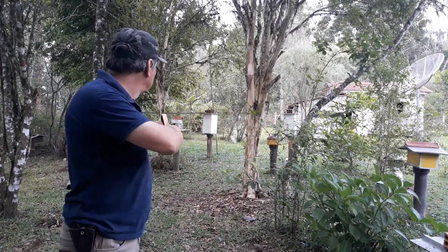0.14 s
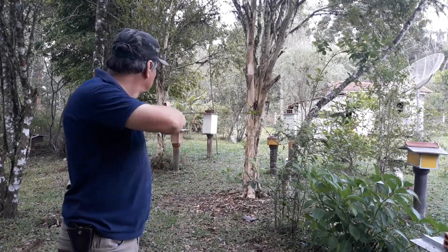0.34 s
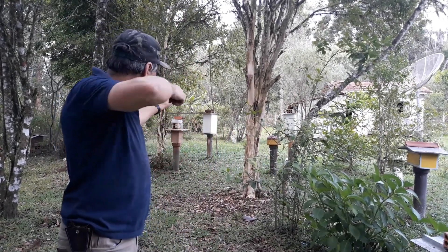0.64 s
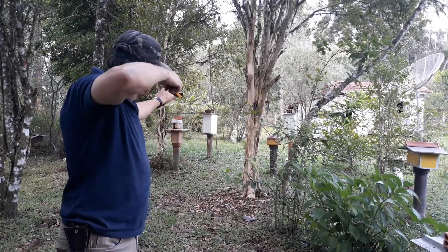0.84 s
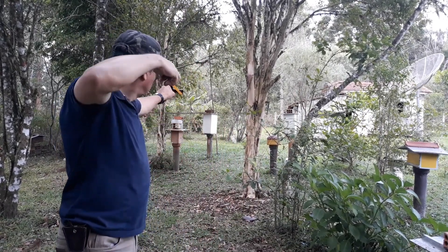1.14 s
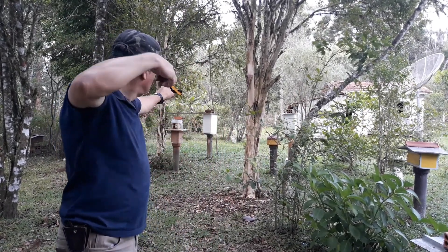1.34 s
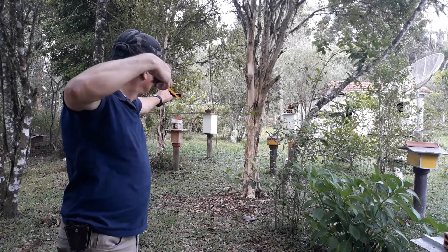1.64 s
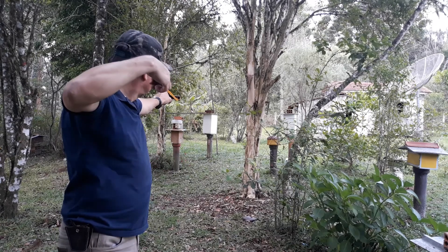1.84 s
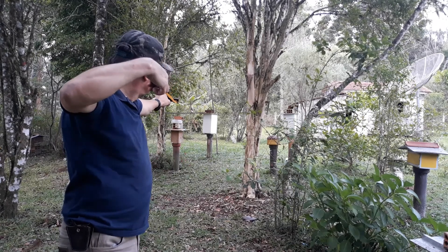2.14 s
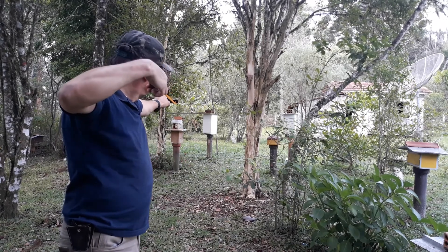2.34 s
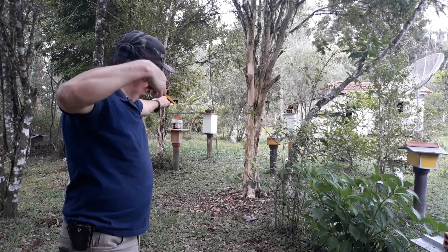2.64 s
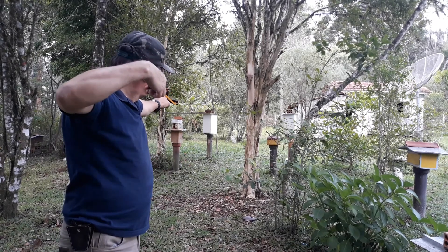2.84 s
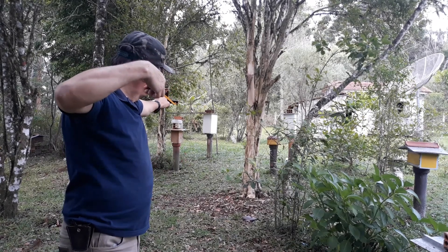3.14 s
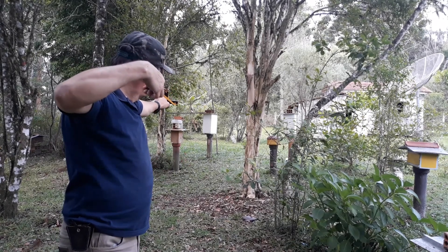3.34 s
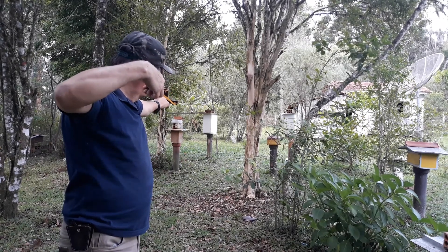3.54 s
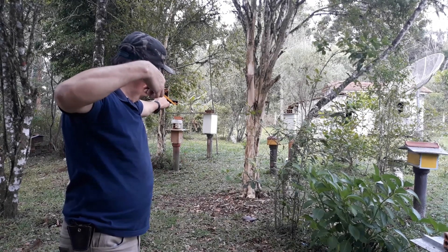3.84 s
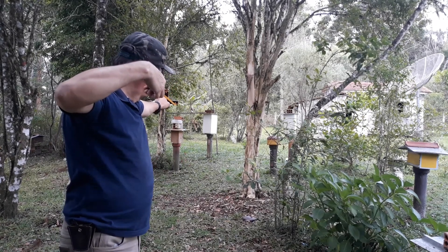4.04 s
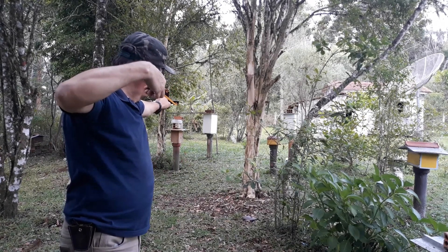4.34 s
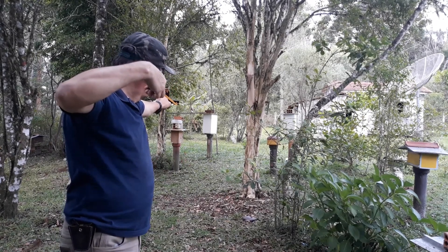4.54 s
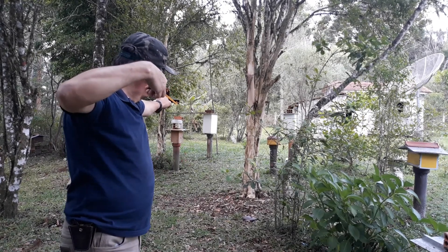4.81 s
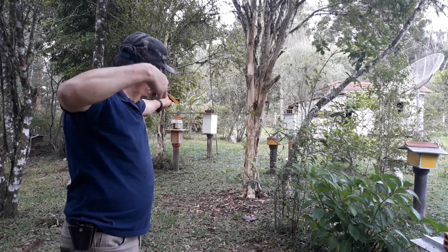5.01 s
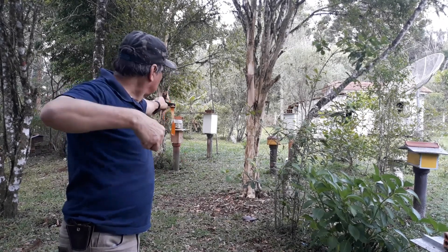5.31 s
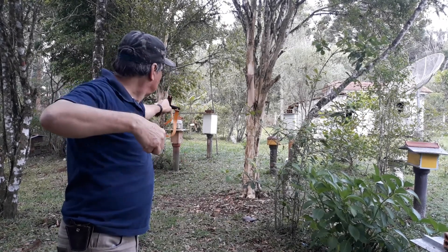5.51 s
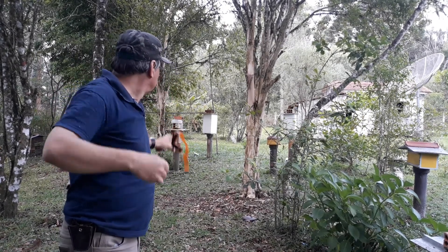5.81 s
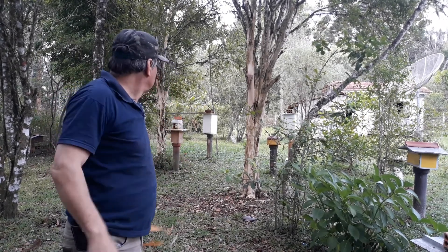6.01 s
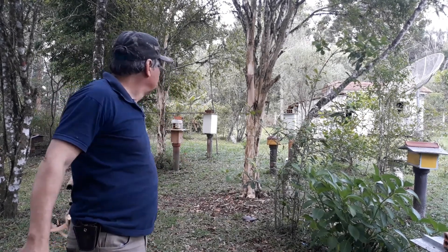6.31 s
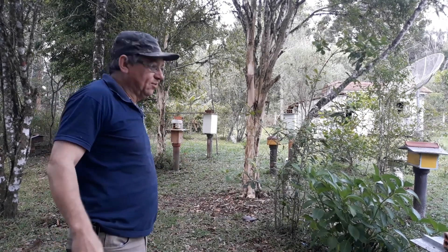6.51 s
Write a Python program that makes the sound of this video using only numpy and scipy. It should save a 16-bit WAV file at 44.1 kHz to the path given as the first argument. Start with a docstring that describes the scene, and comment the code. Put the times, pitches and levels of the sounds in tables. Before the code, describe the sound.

In a quiet garden with birdsong, a slingshot snaps sharply and its shot punches through a tin can, followed by a knock on wood.

```python
"""A slingshot in a quiet garden

Air murmurs, leaves hiss, a breeze buffets the microphone, and a bird whistles four falling notes
over fainter calls. The bands swish and snap; 0.15 s later the shot punches through a tin can and
excites its wall modes, and half a second on something knocks on resonant wood. Trees scatter every
blow into a short tail. At the end a shoe scuffs the leaf litter."""
import sys
import numpy as np
from scipy import signal
from scipy.fft import rfft, irfft, next_fast_len
from scipy.io import wavfile
from scipy.ndimage import uniform_filter1d, map_coordinates

SR = 44100
rng = np.random.default_rng(int(sys.argv[2]) if len(sys.argv) > 2 else 0)


def int16_out(signal):
    """Quantize to a 16-bit WAV file."""
    q = np.round(np.clip(np.atleast_2d(signal).T, -1, 1) * 32767)
    wavfile.write(sys.argv[1], SR, q.astype(np.int16))


N = 293706
TIME = np.arange(N) / SR
T = np.arange(SR * 3 // 4) / SR  # the life of one blow, in seconds
LEAD_S = .005  # time before the centre of a pressure pulse


def amp(db):
    """Amplitude ratio of a level in decibels."""
    return 10 ** (np.asarray(db) / 20)


def unit(x):
    """Normalisation to rms 1."""
    return x / np.sqrt(np.mean(x ** 2) + 1e-20)


def along(points, hz):
    """Interpolation of (Hz, value) points in log frequency."""
    f, v = np.transpose(points)
    return np.interp(np.log(hz + 1), np.log(f + 1), v)


def add(track, s, sound):
    """Superposition of a sound on the track from s seconds."""
    part = track[round(s * SR):][:len(sound)]
    part += sound[:len(part)]


def wobble(rate, size):
    """Smooth random modulation, with rate knots a second."""
    knots = rng.standard_normal(int(size * rate / SR) + 4)
    return map_coordinates(knots, [np.arange(size) * rate / SR])


def filtered(x, response):
    """Linear filtering: the spectrum is multiplied by a frequency response."""
    m = next_fast_len(len(x) + SR // 10, True)
    return irfft(rfft(x, m) * response(np.fft.rfftfreq(m, 1 / SR)), m)[:len(x)]


def resonances(peaks, f):
    """Summed response of damped resonators, each given as (Hz, width in Hz, dB)."""
    return sum(amp(db) * 1j * f * w / (c * c - f * f + 1j * f * w) for c, w, db in peaks)


def noise(spectrum, size=len(T)):
    """White noise shaped to a spectrum, at rms 1."""
    return unit(filtered(rng.standard_normal(size), lambda f: amp(along(spectrum, f))))


def fade(t60):
    """Exponential decay by 60 dB in t60 seconds."""
    return np.exp(-np.log(1000) * np.minimum(T / t60, 10))


def pulse(half_s):
    """A bipolar pressure pulse of peak 1: rarefaction, then compression."""
    u = np.clip((T - LEAD_S) / half_s, -10, 10)
    return u * np.exp((1 - u * u) / 2)


def patchy(x, depth_db):
    """Random modulation: patches of gain drift in time and frequency."""
    z = signal.stft(x, nperseg=512)[2]
    field = uniform_filter1d(rng.standard_normal(z.shape), size=6, axis=0)
    field = uniform_filter1d(field, size=20, axis=1)
    return unit(signal.istft(z * amp(depth_db * unit(field)), nperseg=512)[1][:N])


# Course of the distant murmur. Each row: time in seconds, relative level in dB.
MURMUR_LEVELS = [(0.0, -54.5), (0.25, -53.5), (1.13, -56.5), (1.74, -55), (2.3, -57.5), (5.0, -59)]
# Spectra of the murmur and the leaves. Each row: frequency in Hz, relative density in dB.
MURMUR_SPECTRUM = [(100, -13), (170, -1.5), (270, -2.5), (390, .5), (520, -3), (750, -4.5), (1050, -6),
                   (1500, -12.5), (2200, -11), (2900, -15.5), (3500, -15.5), (6000, -26.5), (8000, -49.5)]
LEAF_SPECTRUM = [(1500, -18.5), (3000, -1.5), (4800, 3), (6800, -1), (9000, 2), (10200, -5.5), (12500, -7),
                 (15800, -14)]


def air_and_leaves():
    """Broadband flow noise: far-off air murmurs, and the hiss of leaves weakly follows its level."""
    air_db = np.interp(TIME, *np.transpose(MURMUR_LEVELS))
    murmur = amp(air_db + 1.5) * patchy(noise(MURMUR_SPECTRUM, N), depth_db=0.95)
    leaves = amp(-68 + .3 * (air_db - air_db.mean())) * noise(LEAF_SPECTRUM, N)
    return murmur + leaves


# Puffs of wind. Each row: centre in seconds, level in dB, half width in seconds.
PUFFS = [(.42, -51, .02), (.725, -40, 0.039), (1.505, -43, 0.041), (2.21, -51, 0.017), (2.53, -55, .04),
         (2.77, -49.5, 0.0225), (3.385, -43.5, 0.0189), (3.51, -48.5, 0.0175), (3.63, -49.5, 0.041),
         (4.82, -47, 0.016), (5.35, -52, 0.034), (5.54, -51.5, 0.026), (5.7, -55.5, 0.036)]
# Spectrum of the buffeting. Each row: frequency in Hz, relative density in dB.
BUFFET_SPECTRUM = [(15, -45.5), (30, -18.5), (55, -3), (85, 1.5), (125, -2.5), (200, -14.5), (320, -28),
                   (700, -58), (1500, -100)]


def breeze():
    """Turbulent pressure on the microphone makes a low rumble that swells with each puff."""
    steady = amp(-60 + 0.5 * wobble(7.8, N))
    puffs = sum(amp(db) / (1 + ((TIME - s) / width) ** 2) for s, db, width in PUFFS)
    return (steady + puffs) * noise(BUFFET_SPECTRUM, N)


# Reverberation of the garden. Each row: frequency in Hz, 60 dB decay time in seconds.
GARDEN_DECAY = [(200, .3), (900, 0.6), (2200, 0.629), (5000, 0.573), (9000, 0.41), (15000, 0.35)]


def garden(x, build_s):
    """Scattering from trunks and foliage: a tail builds up, then dies, lingering in the midrange."""
    hz, t, z = signal.stft(rng.standard_normal(SR), SR, nperseg=256)
    decay = np.exp(-np.log(1000) * t / along(GARDEN_DECAY, hz)[:, None])
    tail = signal.istft(z * decay * (1 - np.exp(-t / build_s)), SR, nperseg=256)[1]
    return signal.fftconvolve(x, tail / np.linalg.norm(tail))[:N]


def whistle(length, start_hz, end_hz, rough_db):
    """A frequency-modulated tone glides fast, flattens out, and flutters as it swells to its middle."""
    size = int(length * SR)
    u = np.arange(size) / size
    glide_hz = end_hz + (start_hz - end_hz) * (1 - u) ** 1.85
    hz = glide_hz * (1 + .0025 * wobble(120, size) + .006 * wobble(22, size))
    swell = amp(-17 * (2 * u - 1) ** 2 + rough_db * wobble(60, size))
    gate = np.clip(np.minimum(u, 1 - u) * length / .012, 0, 1)
    return np.sqrt(2) * gate * swell * np.sin(2 * np.pi * np.cumsum(hz) / SR)


def chatter(from_s=.55, until_s=5.0519, count=45):
    """Faint, randomly timed calls from deep in the trees arrive by scattering alone."""
    calls = np.zeros(N)
    for _ in range(count):
        pitch, glide = rng.standard_normal(2)
        start_hz = 2700 * np.exp(.16 * pitch)
        end_hz = start_hz * np.exp(.13 * glide)
        add(calls, rng.uniform(from_s, until_s), whistle(.09, start_hz, end_hz, rough_db=3.5))
    return amp(-74) * garden(calls, build_s=0.028)


# Short calls of distant birds, and the falling notes of a nearer one.
# Each row: start and length in seconds, first and last frequency in Hz, level in dB.
DISTANT_CALLS = [(0.863, 0.0294, 5100, 4450, -61.5), (0.877, 0.066, 4110, 3000, -63),
                 (1.653, .16, 3260, 3390, -73.5), (1.99, .13, 3550, 3200, -67),
                 (2.029, .1, 2900, 2710, -69), (2.873, 0.0698, 3500, 3910, -61.5)]
SONG_NOTES = [(2.262, 0.21, 5360, 4270, -59.5), (2.576, 0.26, 5960, 3219, -55.5),
              (2.969, .345, 7032, 3113, -56.5), (3.467, 0.23, 5600, 3360, -56.5)]


def birds():
    """The ratio of direct to scattered sound falls with distance, so the nearer bird sounds drier."""
    song, distant = np.zeros(N), np.zeros(N)
    for s, length, start_hz, end_hz, db in SONG_NOTES:
        add(song, s, amp(db) * whistle(length, start_hz, end_hz, rough_db=3.0))
    for s, length, start_hz, end_hz, db in DISTANT_CALLS:
        add(distant, s, amp(db) * whistle(length, start_hz, end_hz, rough_db=2.0))
    return song + amp(-0.5) * distant + garden(amp(-5.5) * song + distant, build_s=0.02)


# Slaps of rubber and pouch. Each row: start in seconds, level in dB, 60 dB decay time in seconds.
SLAPS = [(5.0519, -14, 0.014), (5.0524, -9, 0.027), (5.0543, -16, 0.11), (5.0622, -17.5, 0.2),
         (5.149, -30.5, 0.045), (5.827, -53.5, 0.26), (6.135, -67.5, .2)]
# Bright peaks that colour each slap of the bands. Each row: frequency and bandwidth in Hz, gain in dB.
SNAP_PEAKS = [(2050, 120, -5.5), (3570, 220, 5), (5300, 480, -2), (8500, 510, -5.5)]
# Spectra of a slap and of the fork's jolt. Each row: frequency in Hz, relative density in dB.
SLAP_SPECTRUM = [(150, -30.5), (400, -12), (800, -2.5), (1200, -8), (1700, -12.5), (2230, -4), (2800, -9),
                 (4400, -6.5), (5300, -2.5), (6300, -4), (8300, 1.5), (9900, -6), (14000, -4.5),
                 (15800, -6.5)]
JOLT_SPECTRUM = [(25, -18), (60, 3), (120, 1), (250, -9), (400, -6), (800, -7), (1300, -24), (3000, -50)]


def slingshot():
    """Elastic energy is released: the bands swish forward, whip the air and slap against the fork."""
    snap, snap_s = np.zeros(N), SLAPS[1][0]
    swish = noise([(30, -20), (100, -3), (300, -0.5), (900, 0.5),
                   (1800, -15.5), (8000, -12), (15000, -27.5)])
    add(snap, snap_s - T[-1], amp(-29) * fade(.055)[::-1] * swish)  # swells into the snap
    for s, db, t60 in SLAPS:
        slap = unit(filtered(noise(SLAP_SPECTRUM), lambda f: 1 + resonances(SNAP_PEAKS, f)))
        add(snap, s, amp(db) * fade(t60) * slap)
    add(snap, 5.0555 - LEAD_S, amp(-11.5) * pulse(half_s=0.00031))  # air pushed by the bands
    # The fork jolts as the bands run out, and the slack bands go on flapping.
    add(snap, snap_s, amp(-23.5) * fade(0.092) * noise(JOLT_SPECTRUM))
    flapping = noise([(30, -24), (90, 1.5), (250, -3), (800, -1.5), (1500, -20.5), (4000, -50.5)])
    add(snap, snap_s, amp(-32) * fade(0.24) * flapping)
    return snap + amp(-18.0) * garden(snap, build_s=0.019)


# The shot tears through both walls and the can rattles.
# Each row: start in seconds, crack level in dB, relative ring level in dB.
PUNCHES = [(5.2047, -11.5, -19), (5.2060, -20.5, -26), (5.213, -18, -23), (5.2160, -19, -25.5),
           (5.2215, -24, -29.5)]
# Wall modes. Each row: frequency in Hz, relative level in dB, 60 dB decay time in seconds.
TIN_MODES = [(789, -10, 0.12), (871, -1, 0.051), (937, 2.5, 0.087), (1027, 0.5, 0.091), (1102, 1.5, 0.063),
             (1270, -6, .1), (1345, -16, .17), (1387, -14, .06), (1730, -18.5, .13), (1880, -5.5, .07),
             (1960, -5, 0.15), (2357, -15, .1), (2510, -11.5, 0.1), (2650, -19, 0.089), (3250, -12, 0.15),
             (3499, -14.5, 0.17), (4323, -17, .16), (5340, -9, 0.15), (8370, -19.5, 0.14),
             (8650, -16.5, .12)]
# Spectrum of the can's crowded modes. Each row: frequency in Hz, relative density in dB.
SHELL_SPECTRUM = [(100, -19.5), (500, -18.5), (680, -14), (830, 8), (1100, 8), (1500, -1.5), (2050, 4.5),
                  (2900, -0.5), (3700, 2), (4800, -0.5), (6500, -3), (8700, 0.5), (10500, -4.5),
                  (15800, -3.5)]


def tin_can():
    """Modal vibration of a thin shell: each punch cracks the tin and leaves it ringing."""
    hz, mode_db, t60 = np.transpose(TIN_MODES)[:, :, None]
    envelopes = amp(mode_db) * fade(t60)
    hit = np.zeros(N)
    for s, crack_db, ring_db in PUNCHES:
        chance = rng.standard_normal((len(TIN_MODES), 2))
        dented_hz = hz * (1 + .012 * chance[:, 1:])  # denting detunes the modes at each blow
        tones = amp(1.6 * chance[:, :1]) * envelopes * np.sin(2 * np.pi * dented_hz * T)
        ring = tones[::2].sum(axis=0) - tones[1::2].sum(axis=0)  # neighbours swing in antiphase
        shell = (amp(crack_db) * fade(0.0072) + amp(ring_db + 1.5) * fade(0.2)) * noise(SHELL_SPECTRUM)
        add(hit, s, amp(ring_db - 3.5) * ring + shell)
    # The first two punches also bulge a wall.
    add(hit, PUNCHES[0][0] + 0.000197 - LEAD_S, amp(-2.0) * pulse(half_s=0.000091))
    add(hit, PUNCHES[1][0] - LEAD_S, amp(-10.5) * pulse(half_s=0.0001))
    # The small can radiates little bass into the garden.
    radiation = [(480, -16.0), (800, 0.5), (1100, -5.0), (1600, -3.5), (2500, -3.5)]
    outward = filtered(hit, lambda f: amp(along(radiation, f)))
    return hit + amp(-8.5) * garden(outward, build_s=.024)


def background_dip(deepest_s=6.121, sink_s=0.52, return_s=0.32, depth_db=-8):
    """Gain reduction: the recorder turns the background down briefly after the shot."""
    t = TIME - deepest_s
    return amp(depth_db * np.exp(-(t / np.where(t < 0, sink_s, return_s)) ** 2))


# A blow and its bounces. Each row: start in seconds, relative level in dB, 60 dB decay time in seconds.
KNOCKS = [(5.7217, -20, 0.011), (5.729, -37.5, 0.057), (5.7395, -30, 0.027)]
# Resonances of the wood. Each row: frequency in Hz, bandwidth in Hz, gain in dB.
WOOD_MODES = [(910, 240, -10.5), (2018, 380, -6.5), (2230, 315, 0), (2900, 224, -10), (3490, 110, -30.5)]


def knock():
    """Impact excitation: a hard blow and two small bounces drive the heavily damped modes of wood."""
    blows = np.zeros(N)
    for s, db, t60 in KNOCKS:
        add(blows, s, amp(db) * fade(t60) * rng.standard_normal(len(T)))
    contact = [(500, 1), (1600, 13.5), (3200, 8), (6500, -12), (12000, -30.5)]
    hit = filtered(blows, lambda f: resonances(WOOD_MODES, f) * amp(along(contact, f)))
    return hit + amp(-7.0) * garden(hit, build_s=0.019)


# A shoe turning. Each row: start in seconds, level in dB, 60 dB decay time in seconds.
SCUFFS = [(6.498, -52, 0.11), (6.544, -44, 1)]
# Spectrum of the leaf litter. Each row: frequency in Hz, relative density in dB.
LITTER_SPECTRUM = [(300, -8.5), (1400, -12), (2000, -4.5), (2350, 2.5), (2800, -8.5), (3200, -4),
                   (3900, -8.5), (4450, -21.5), (5100, -9), (6000, -18), (7800, -18), (9100, -12),
                   (10000, -25), (15800, -22)]


def scuffs(rise_s=0.00285):
    """Friction noise: a shoe touches the dry litter, then drags over it."""
    rustle = np.zeros(N)
    for s, db, t60 in SCUFFS:
        add(rustle, s, amp(db) * (1 - np.exp(-T / rise_s)) * fade(t60) * noise(LITTER_SPECTRUM))
    return rustle


def scene():
    """Superposition of all sources at one microphone."""
    background = background_dip() * (air_and_leaves() + breeze())
    return (background + birds() + slingshot() + tin_can() + knock() + scuffs() + chatter())[None]


def record(dry):
    """Clipping and band limiting: peaks flatten at full scale, and the treble ends steeply."""
    top_hz, slope_width_hz = 15900, 500
    edge = lambda f: np.clip((top_hz - f) / slope_width_hz + .5, 0, 1)
    return filtered(np.clip(dry[0], -1, 1), lambda f: np.sin(np.pi / 2 * edge(f)) ** 2)[None]


dry = scene()
out = record(dry)
int16_out(out)
```